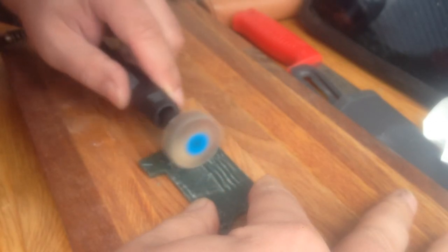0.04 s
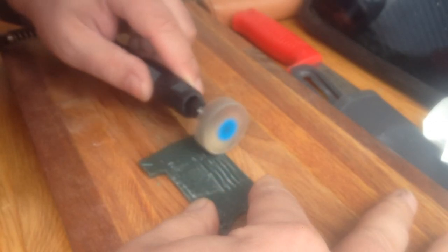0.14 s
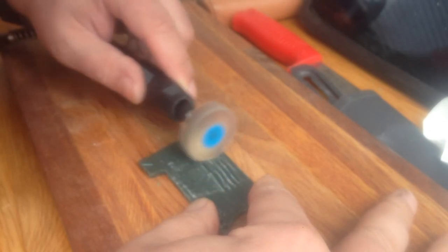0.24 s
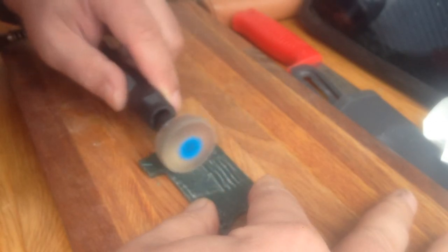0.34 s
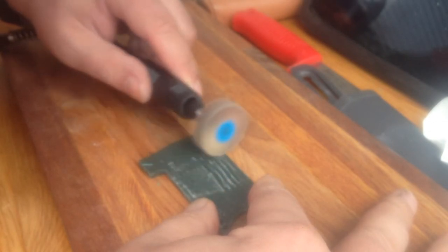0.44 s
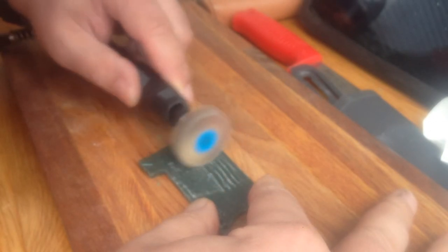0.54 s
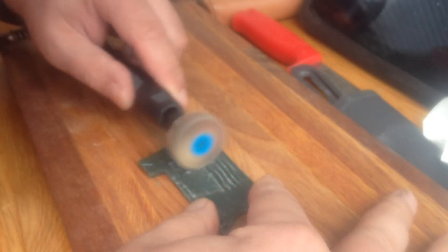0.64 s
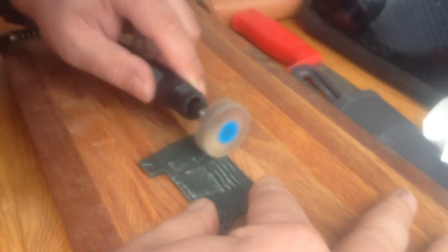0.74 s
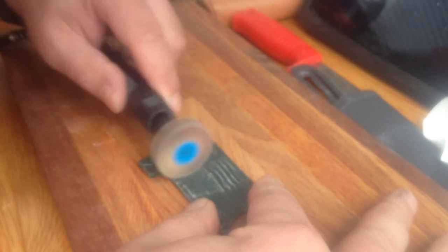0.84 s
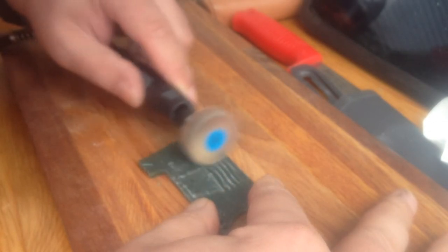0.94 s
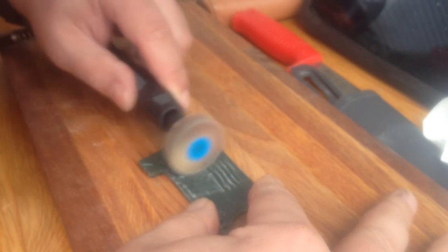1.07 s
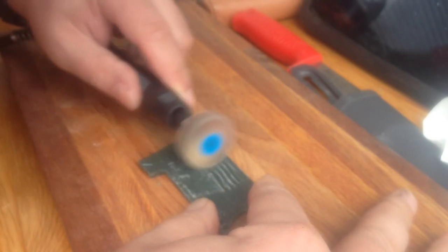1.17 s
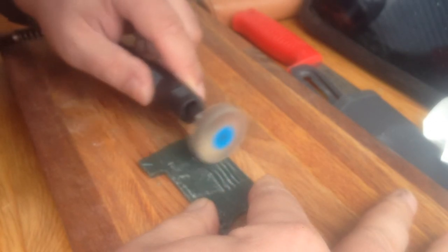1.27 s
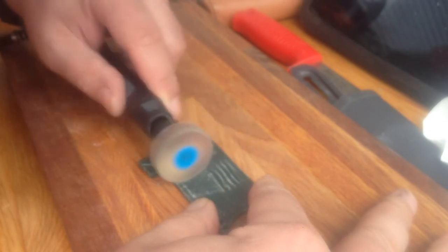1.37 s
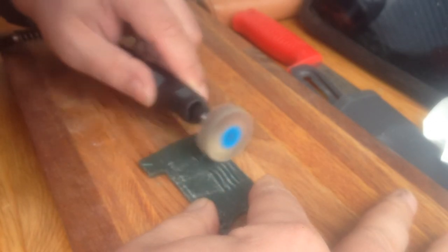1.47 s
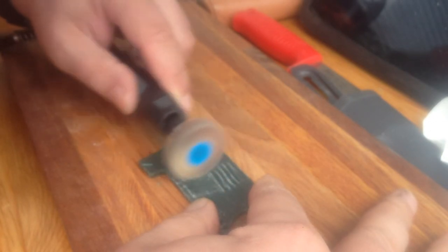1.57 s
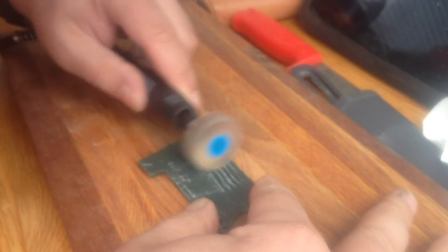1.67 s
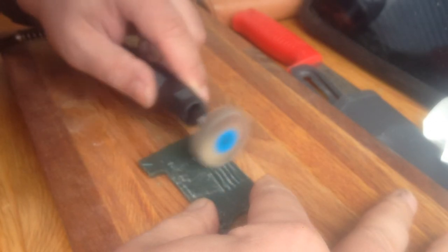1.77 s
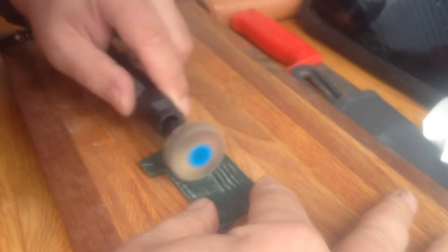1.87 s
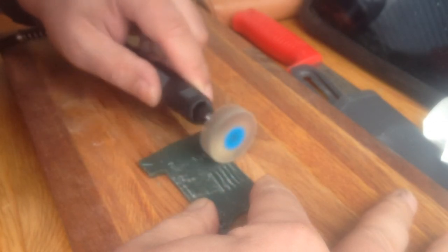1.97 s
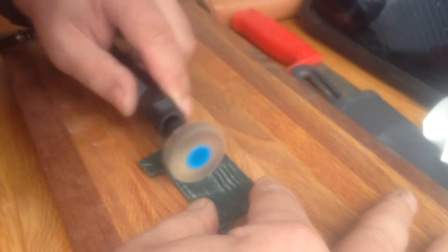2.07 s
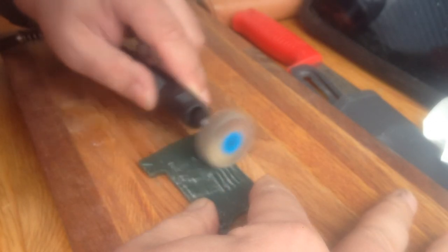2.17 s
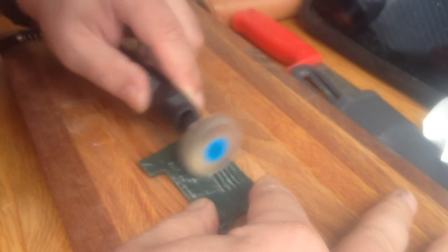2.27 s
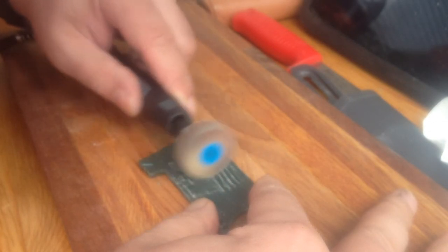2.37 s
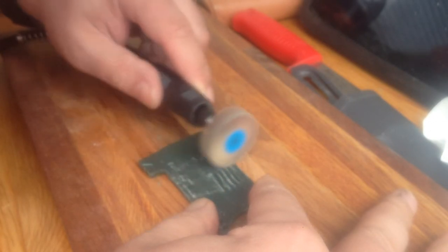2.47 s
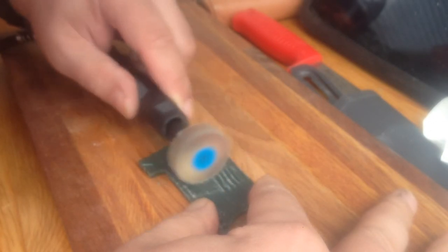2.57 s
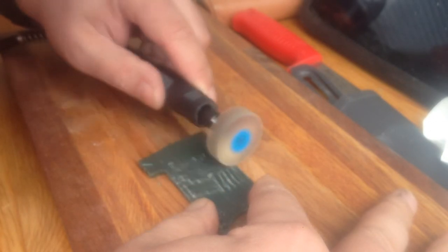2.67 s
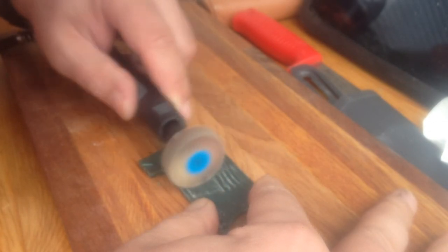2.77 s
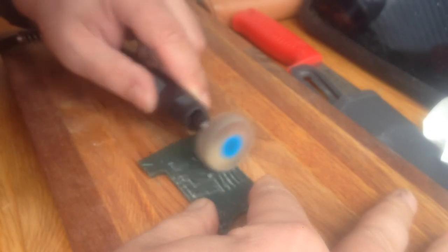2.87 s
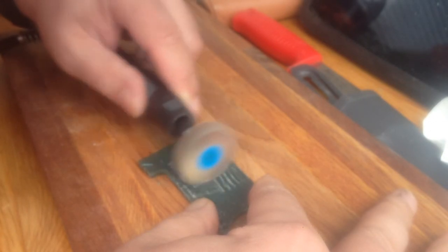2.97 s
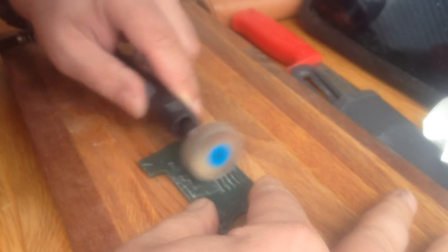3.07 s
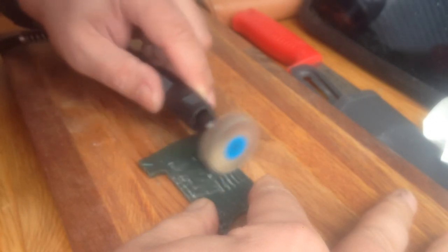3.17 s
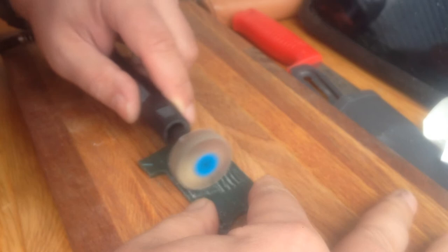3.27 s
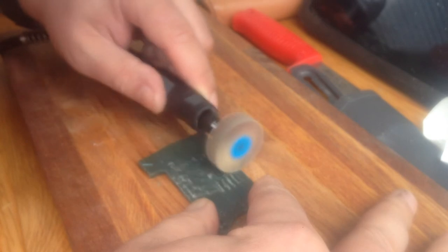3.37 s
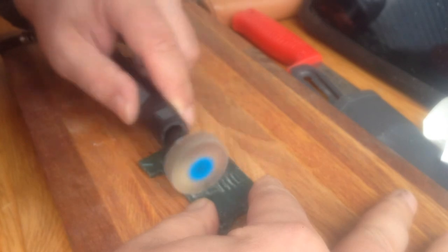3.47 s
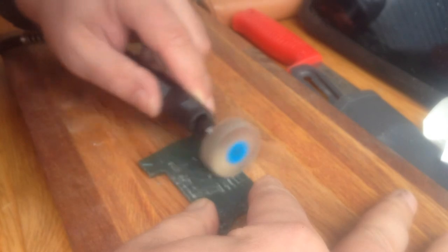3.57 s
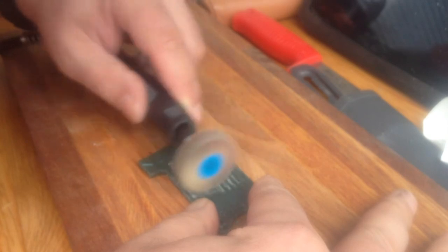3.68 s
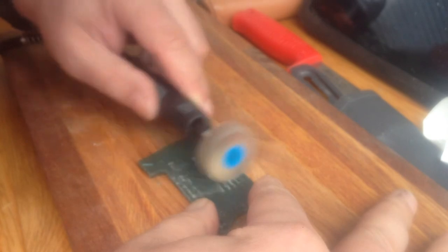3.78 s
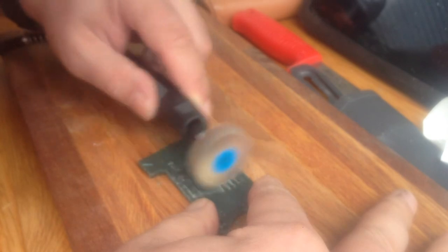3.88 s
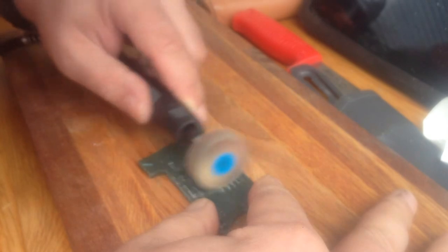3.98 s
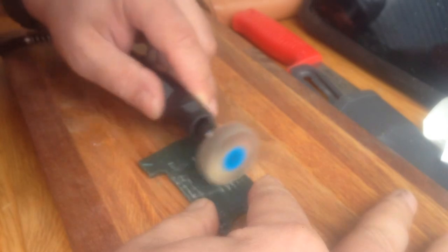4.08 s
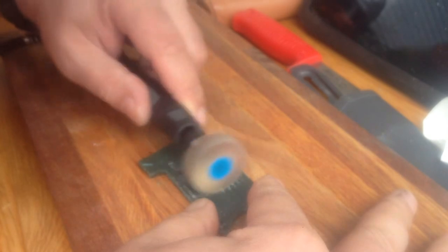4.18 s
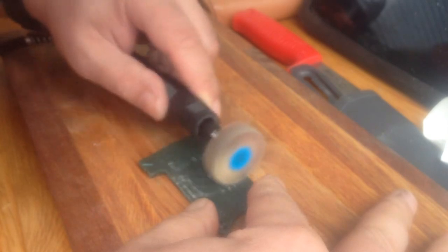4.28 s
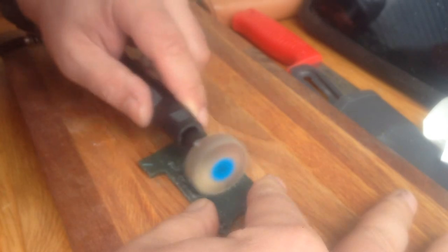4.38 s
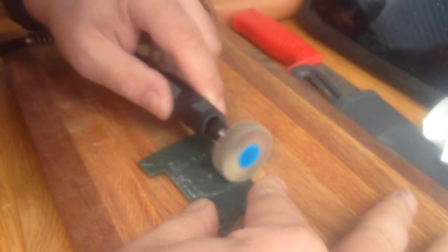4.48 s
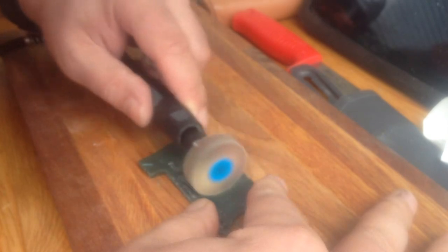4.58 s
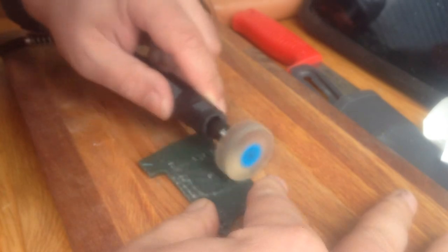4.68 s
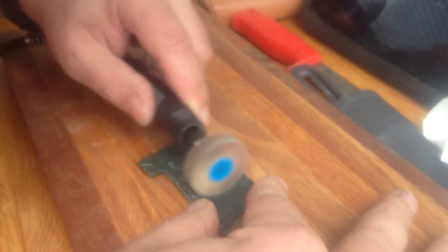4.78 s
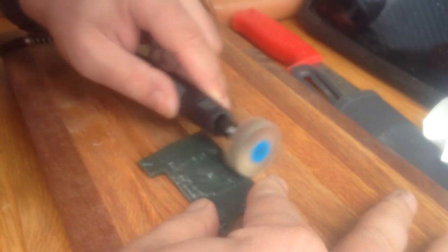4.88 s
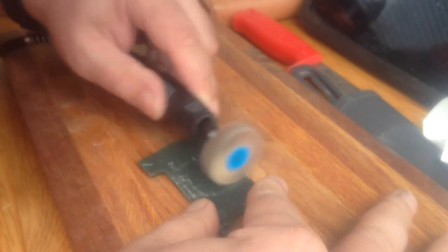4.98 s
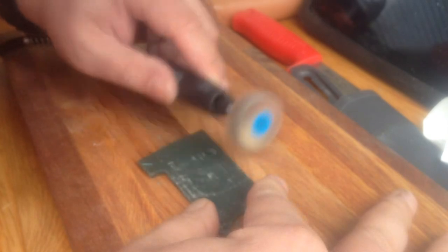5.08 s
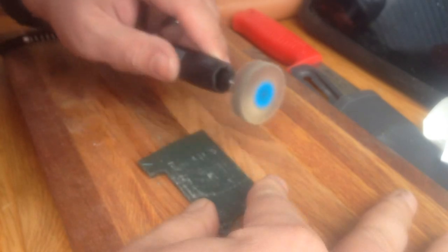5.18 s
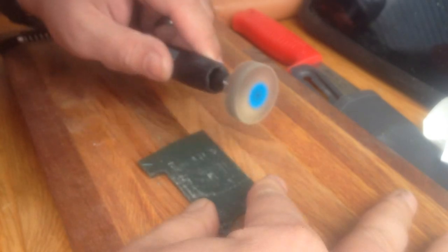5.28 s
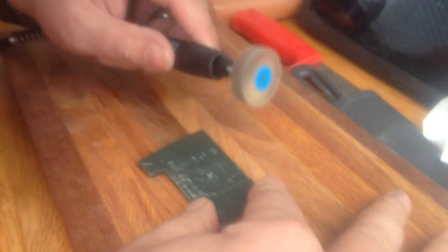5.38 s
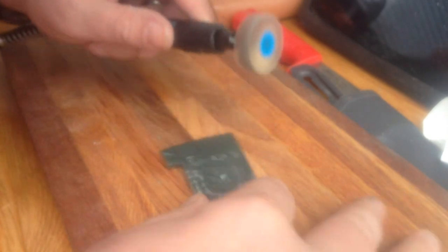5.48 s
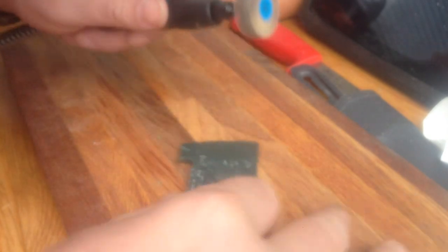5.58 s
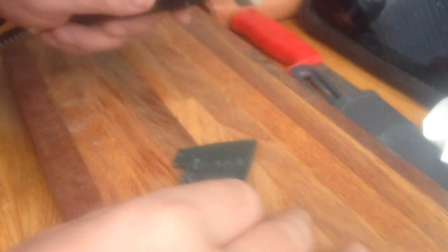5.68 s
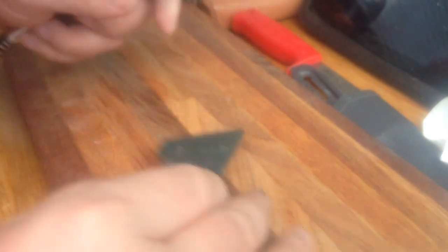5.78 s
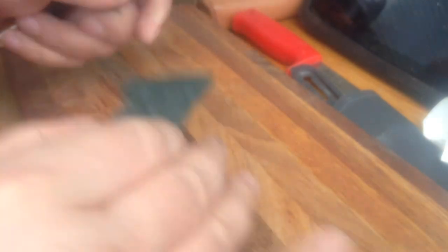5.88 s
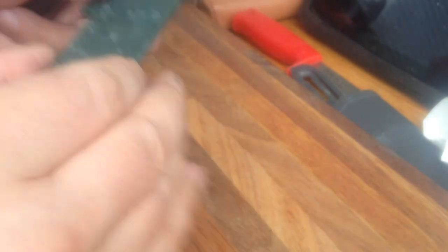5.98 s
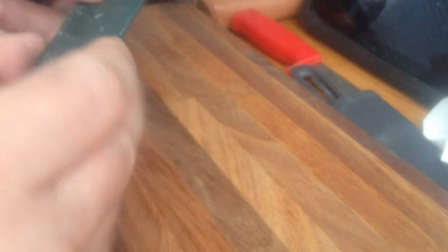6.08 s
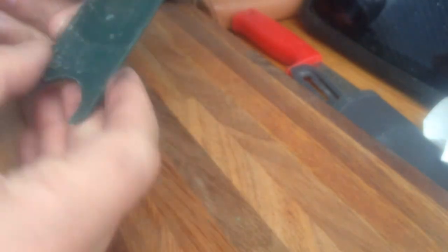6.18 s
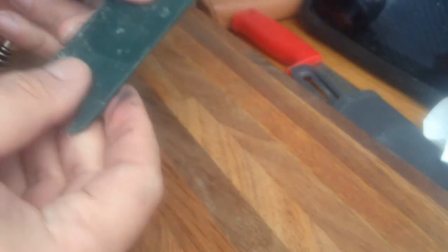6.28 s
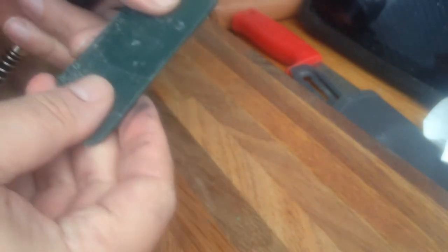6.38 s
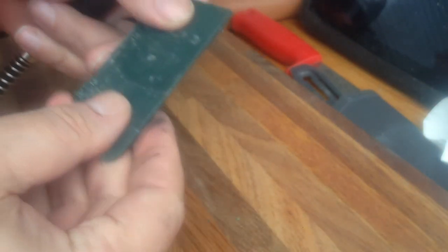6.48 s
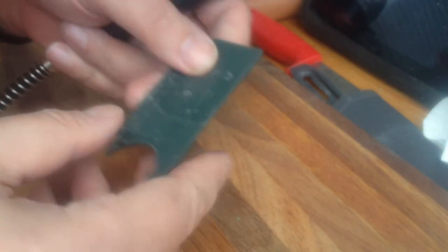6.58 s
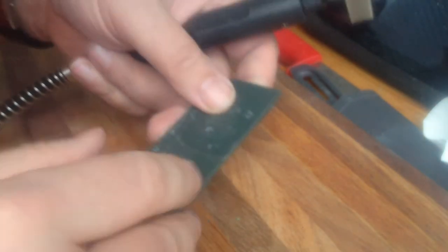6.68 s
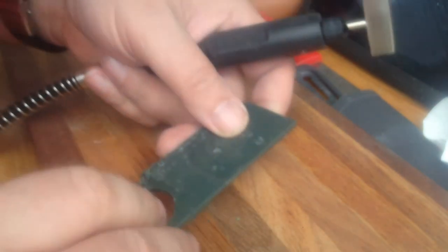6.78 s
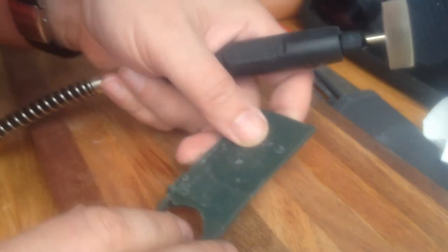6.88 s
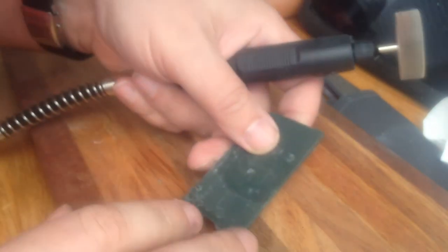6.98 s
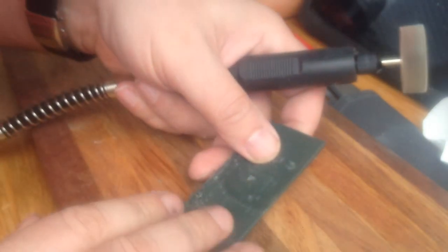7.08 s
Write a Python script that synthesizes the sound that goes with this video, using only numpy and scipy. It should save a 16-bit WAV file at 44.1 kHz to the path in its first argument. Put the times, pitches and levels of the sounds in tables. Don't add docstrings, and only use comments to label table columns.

```python
import sys
import numpy as np
from scipy import signal
from scipy.fft import rfft, irfft
from scipy.io import wavfile
from scipy.ndimage import uniform_filter1d, map_coordinates

SR = 44100
rng = np.random.default_rng(int(sys.argv[2]) if len(sys.argv) > 2 else 0)


def inscribe(sig):
    pcm = np.round(np.clip(np.atleast_2d(sig).T, -1, 1) * 32767)
    wavfile.write(sys.argv[1], SR, pcm.astype(np.int16))


def how_loud(loudness_db):
    steps = np.asarray(loudness_db, float) / 20
    return 10 ** steps


N = 314874
TIME_S = np.arange(N) / SR

# start_s, bite_sharpness, returning_grain_share (0-1)
CONTACT = [(0, 2.9, .55), (.19, 1.3, .55), (.25, .3, .75), (.4, .64, .66), (.75, .63, .52), (1, .98, .28),
           (2, .7, .38), (4, .62, .42), (4.9, .55, .53), (5.15, .63, .3), (5.5, .6, .5), (7.14, .6, .55)]


def in_time(rows):
    s, *columns = np.transpose(rows)
    return [np.interp(TIME_S, s, column) for column in columns]


def rms_one(x):
    return x / np.sqrt(np.mean(x ** 2) + 1e-20)


def drift(rate_hz):
    r = np.exp(-40 * np.pi * rate_hz / SR)
    slow = signal.lfilter([1], [1, -2 * r, r * r], rng.standard_normal(N // 20 + 4002))[4000:]
    return np.interp(np.arange(N) / 20, np.arange(len(slow)), rms_one(slow))


def low_pass(x, order, hz):
    return signal.sosfilt(signal.butter(order, hz, fs=SR, output="sos"), x)


def high_pass(x, order, hz):
    return signal.sosfilt(signal.butter(order, hz, "high", fs=SR, output="sos"), x)


def band_pass(x, order, low_hz, high_hz):
    return signal.sosfilt(signal.butter(order, [low_hz, high_hz], "band", fs=SR, output="sos"), x)


def resonance(x, hz, width_hz):
    r = np.exp(-np.pi * width_hz / SR)
    return signal.lfilter(np.array([1, 0, -1]) * (1 - r * r) / 2, [1, -2 * r * np.cos(2 * np.pi * hz / SR), r * r], x)


def body(x, modes):
    rings = [how_loud(db) * resonance(x, hz, width_hz) for hz, width_hz, db in modes]
    return rms_one(sum((-1) ** k * ring for k, ring in enumerate(rings)))


def coloured(x, spectrum):
    hz, db = np.transpose(spectrum)
    bins_hz = np.maximum(np.arange(N // 2 + 1) * SR / N, 1)
    return rms_one(irfft(rfft(x) * how_loud(np.interp(np.log(bins_hz), np.log(hz), db)), N))


def moving_rings(x, hz, width_hz, apart_hz, place):
    carrier = np.exp(2j * np.pi * np.cumsum(hz) / SR)
    r = np.exp(-np.pi * width_hz / SR)
    low = x * carrier.conj()
    rings = 0
    for side in (-1, 0, 1):
        share = 0.037 + np.exp(-1.5 * (place - side) ** 2)
        pole = r * np.exp(2j * np.pi * side * apart_hz / SR)
        rings = rings + share * signal.lfilter([1 - r], [1, -pole], low)
    return 2 * np.real(rings * carrier)


def boom_db(tone_hz, mode):
    hz, width_hz, db = mode
    return 20 * np.log10(1 + how_loud(db) / (1 + (2 * (tone_hz - hz) / width_hz) ** 4) ** 2)


def lifted():
    return np.interp(TIME_S, [4.999, 5.004, 5.02, 5.039, 5.044, 5.12, 5.13, 5.165],
                     [0.99, 0.61, 0.2, 0.11, 0.92, 0.85, 0.434, 0.029])


def settling_db():
    settle_s = (0.142, 0.466)     # start_s, end_s
    return np.interp(TIME_S, settle_s, [-5.5, 0])


def bite(turns, sharpness, uneven_db, lets_go=0):
    strength = how_loud(uneven_db * rng.standard_normal(2000))
    cosine = np.cos(2 * np.pi * turns)
    skewed = np.cos(2 * np.pi * turns + lets_go * (1 - cosine))
    lobe = np.exp(sharpness * (skewed - 1)) * np.interp(turns, np.arange(2000), strength)
    return lobe / np.sqrt(uniform_filter1d(lobe ** 2, size=2400))


def grit(turns, worn_in):
    grains = rng.standard_normal((160, 320))
    returning = map_coordinates(grains, [turns / 12 + 2, turns % 1 * 320], order=1, mode="grid-wrap")
    returning = rms_one(signal.lfilter([1, -.35], [1], returning))
    share = np.clip(worn_in * in_time(CONTACT)[1], 0, 1)
    return np.sqrt(share) * returning + np.sqrt(1 - share) * rng.standard_normal(N)


def wheel_turns(turns, press_db):
    load = uniform_filter1d(press_db, size=2500)
    load = (load - uniform_filter1d(load, size=12000)) * lifted()
    return turns - .55 * np.cumsum(load) / SR + 0.0392 * drift(3) + 0.0031 * drift(27)


def pressing():
    # start_s, length_s, pressure_db, place (0-3 from the tab to the far edge, more counts as 3)
    passes = [(-0.05, 0.087, -31, 0.23), (0.075, 0.074, -31.5, 0.36), (0.173, 0.057, -32.5, 0.044),
              (0.258, 0.056, -24, 0.49), (0.357, 0.065, -28, 0.28), (0.452, 0.071, -29, 0.7),
              (0.662, 0.12, -29, 0.57), (0.907, 0.16, -29.5, 0.87), (1.166, 0.14, -27, 0.8),
              (1.414, 0.15, -26.5, 0.78), (1.657, 0.14, -27.5, 1.12), (1.907, 0.14, -27, 1.6),
              (2.14, 0.14, -27.5, 1.68), (2.379, 0.15, -29, 1.7), (2.612, 0.14, -28.5, 1.75),
              (2.827, 0.17, -29, 2), (3.031, 0.18, -30, 2.29), (3.25, 0.219, -28, 2.47),
              (3.507, 0.19, -28.5, 2.68), (3.745, 0.15, -27.5, 2.66), (3.974, 0.17, -27.5, 2.82),
              (4.183, 0.15, -29, 2.6), (4.413, 0.12, -29.5, 3.63), (4.649, 0.11, -29, 3.4),
              (4.867, 0.082, -28.5, 2.96), (5.048, 0.037, -27.5, 2.8)]
    # middle_s, pressure_db, place (0-3, more counts as 3)
    returns = [(0.586, -29.5, 2.5), (0.847, -32.5, 1.5), (1.114, -38.5, 0.5), (1.361, -26.5, 1.5),
               (1.614, -31.5, 5), (1.857, -22.5, 2), (2.093, -26.5, 1.5), (2.337, -21.5, 2),
               (2.577, -22, 2.2), (2.796, -24, 1.5), (3.221, -35.5, 3), (3.927, -33.5, 1.5),
               (4.593, -35, 2.1), (4.813, -29.5, 0.8), (4.992, -33, 0.5)]
    # brushing_db, rise_along_pass_db, ends_over_middle_db, place_0_db, place_1_db, place_2_db, place_3_db
    answers = [
        (-39.5, 1.5, -0.22, -3.5, -3, 3, -0.97),
        (-51.5, 2, -1.5, 1, -6.5, -9.5, 4),
        (-69, 0, 4, -8.5, 10, 7, -2),
        (-41.5, -1.5, 6.5, 12, 4.5, 4, 1.5),
        (-34.5, -13.5, -1.5, -9, -22, -6, -11.5),
        (-48.5, 3, 5.5, -31, -16.5, -18.5, -22.5),
        (-43.5, 3, -9, -46, -25, -49, -75),
    ]
    edge = [1, 0.5, 1.5, -1, 1.5, -2, 2, -1.5, 0.5, -0.2, -1.7, 0.1, -0.5, 2, 1.7, 1.5, 3.7, 1.9, 3, 0.5,
            1.5, 0.5, 3.5, 2.5, 4.5, 8, -5, -5.5, -4, -13.5, -1.5, -5.5, -8, -5.5, -4, -4.5, 3, 2.5, 4, 3.5,
            1]
    rim = [2.5, 1, 4, -1.5, 1.7, 4, -1.3, 1, 1.5, -0.5, 3.5, 0.5, 2, .3, -0.5, -2.5, -6, -2, -2.5, 0, -2.5,
           2, 0, -0.5, -1, -5.5, 9, 11, 8.5, 17.5, 10.5, 13, 8, 7, 5, 2.5, -2, 3, -11, -6, -7]
    face = [-2, -0.5, .3, -3, 0, 2, -2, 2, 0, -1.5, 0, 1.5, 2, 2, 3.5, 3, 1.5, .3, 1, 0.5, -0.5, 3, 0, .3,
            0, 2, .3, 8, -1, 2, -4, .3, .3, -4, -2, -5, -3, 4, 7, 6, 5]
    weight = [.3, 6, -1, -11, 7, -10, 9.5, 7.5, 8.5, 9, 5, 7, 8.5, 9, 4, 6, 6, 6, 3, 7.5, -4, 6, 2, -14, 6,
              -20, -5, -2, 18, 10, 8, 1, -3, -14, 3, -28, 3, 0, -11, -13, 8]
    bow = [0.63, -0.0086, .3, 2.5, 1.55, 1.4, 2.3, 0.59, 2.1, 1.2, -0.34, -0.23, 1.2, 0.32, 1.6, 2, 1.6,
           1.4, 0.71, 0.66, 0.56, 0.25, 0.69, .3, 1.4, .3, -0.18, 0.82, 0.21, 0.17, 0.37, 0.14, .3, 0.56,
           0.5, 0.7, 0.54, 2.15, .3, -0.014, .3]
    lean = [0.27, .3, 0.27, 0.35, .3, .3, 0.55, 0.34, 0.56, .3, .3, 0.27, .3, 0.34, 0.35, 0.35, 0.21, 0.4,
            0.15, 0.36, 0.34, .3, .3, .3, 0.23, .3]
    press_s, ease_s, return_s = 0.055, 0.0406, 0.0278
    rows = passes + [(s - return_s / 2, return_s, db, place) for s, db, place in returns]
    start, length, db, place = np.transpose(rows)[:, :, None]
    t = np.arange(0, N + 64, 64) / SR
    shape = np.clip((t - start) / press_s + .5, 0, 1) * np.clip((start + length - t) / ease_s + .5, 0, 1)
    along = np.clip((t - start) / length - .5, -.5, .5)
    edge_db, rim_db, face_db, weight_db, bow_db = np.array([edge, rim, face, weight, bow])[:, :, None]
    lean_db = np.pad(lean, (0, len(returns)))[:, None]
    grips = [0, face_db, edge_db, edge_db + rim_db, 0.64 * edge_db + .4 * rim_db, weight_db, 0]
    light_db = np.interp(t, TIME_S, settling_db())
    levels_db = []
    for (brush_db, rise_db, ends_db, *by_place), grip_db in zip(answers, grips):
        touch_db = db + np.interp(abs(place), range(4), by_place) + grip_db
        touch_db = touch_db + (rise_db + lean_db) * along + ends_db * (2.8 * along ** 2 - 1.01)
        gain = how_loud(brush_db + light_db) + np.sum(shape * how_loud(touch_db), axis=0)
        levels_db.append(np.interp(TIME_S, t, 20 * np.log10(gain)))
    progress = np.sum((shape * (along + .5))[:len(passes)], axis=0) - .5
    return levels_db, np.interp(TIME_S, t, progress), np.interp(TIME_S, t, np.sum(shape * bow_db, axis=0))


def room():
    # freq_hz, density_db (per Hz)
    spectrum = [(15, -51), (25, -20), (135, -42), (183, 9), (238, 2.5), (509, -5), (762, 2), (882, 1.5),
                (1200, 0), (1560, -43), (2640, -120)]
    hum_db = -63 - 1.5 + 3.4 * lifted() + 2.5 * np.tanh(drift(5.6))
    hum = np.sqrt(2) * how_loud(hum_db) * np.sin(2 * np.pi * 99.4 * TIME_S)
    rumble_db = np.interp(TIME_S, [2.8, 3.1, 4.1, 4.3, 5.0, 5.2, 5.5, 5.7], [5.5, 7, 6.7, 3.64, 6.2, 9.7, 7, 1.5])
    rumble_db = rumble_db - 66.0 + 7.9 * np.tanh(drift(7.4))
    rumble = body(rng.standard_normal(N), [(34, 21, -2.5), (58, 20, 2.0), (109, 21, 5.0)])
    return how_loud(-57) * coloured(rng.standard_normal(N), spectrum) + how_loud(rumble_db) * rumble + hum


def bumps():
    # start_s, peak_db, pitch_hz, t60_s
    knocks = [(5.562, -36, 172.2, 0.1), (5.591, -36, 90.4, 0.11), (5.625, -45, 109, 0.096),
              (5.859, -24.5, 148.7, 0.042), (5.869, -35, 169, 0.038), (5.876, -20.5, 97, 0.079),
              (5.904, -26.5, 114, 0.17), (5.93, -42, 128, 0.19), (5.974, -37, 120, 0.066),
              (6.859, -41, 91.4, .08), (6.902, -39, 80, 0.069), (6.919, -40, 75.2, 0.12),
              (6.945, -46, 99.8, 0.073), (7.125, -27.5, 89.9, 0.073), (7.131, -42.5, 101.6, 0.11)]
    out, t = np.zeros(N + SR), np.arange(SR // 4) / SR
    puffs = low_pass(rng.standard_normal((len(knocks), len(t))), 2, 450)
    for (s, db, hz, t60), puff in zip(knocks, puffs):
        envelope = how_loud(db - 60 * t / t60) * (1 - np.exp(-t / 0.00041))
        first = round(s * SR)
        out[first:first + len(t)] += (np.sin(2 * np.pi * hz * t) + 1.9 * puff) * envelope
    return out[:N]


def rubs():
    # middle_s, length_s, centre_hz, level_db
    slides = [
        (5.88, 0.29, 3900, -43.5),
        (6.224, 0.11, 4500, -55),
        (6.799, 0.27, 4200, -43),
        (7.05, 0.21, 4700, -48.5),
        (5.566, .018, 1500, -43),
        (6.7, .08, 3350, -42),
        (6.5, .4, 9100, -60),
    ]
    skin = rng.standard_normal(N)
    out = 0
    for s, length, hz, db in slides:
        swell = np.clip(1 - abs(TIME_S - s) / length, 0, 1)
        out = out + how_loud(db) * swell * rms_one(resonance(skin, hz, 900))
    return out


def motor(turns, speed_hz):
    # start_s, once_a_turn_db, other_multiples_db
    whine = [(0, -55, 7.5), (.35, -45.5, 8.5), (.9, -47, 1), (2.1, -51.5, -10.5), (3, -50.5, -1),
             (4.95, -51.5, 2.5), (5.05, -62, -1), (5.4, -62, -1), (5.6, -55, -1.5), (6.25, -56, -1.5),
             (6.62, -42, 3), (6.9, -59, 0), (7.14, -62, 5)]
    # speed_multiple, level_db
    harmonics = [(2, -72.5), (3, -72), (3.53, -71.5), (5, -65.5), (6, -62.5), (7, -70.5), (8, -60.5),
                 (9, -60.5), (10, -60.5), (11, -58.5), (12, -58), (13, -56), (14, -62.5), (16, -55)]
    # mode_hz, width_hz, lift_db
    housing = [(310, 11, 21), (527, 16, 14.5), (1462, 19, 3.5), (2800, 45, 9)]
    # mode_hz, width_hz, lift_db
    can = (695.6, 128, 26.3)
    # mode_hz, width_hz, lift_db
    cap = (860, 48, 17.1)
    whistles = [32, 48]
    # start_s, first_db, second_db
    whistle_db = [(0, -62, -66), (5.0, -64, -68), (5.4, -72, -70), (5.75, -54, -63), (6.1, -53, -57),
                  (6.3, -63, -58), (6.7, -62, -58), (6.95, -56, -63), (7.14, -57, -64)]
    # start_s, then level_db at 3.53, 8, 13, 14 and 16 a turn
    free_tones = [(5.2, -75, -78, -78, -75, -78), (5.5, -66, -62, -64, -66, -68),
                  (5.75, -66, -65.5, -60, -67, -62), (5.95, -59, -50, -56, -66.5, -55),
                  (6.2, -62, -58, -57, -63, -62), (6.5, -59, -64, -57, -56, -61),
                  (6.8, -55.5, -60, -57, -58, -62), (7.14, -61.5, -64, -61.5, -42, -60)]
    once_db, other_db = in_time(whine)
    load = lifted()
    tones = [(1, once_db), (4, -68.5 + 2 * settling_db() + boom_db(4 * speed_hz, can)),
             (4.41, -68.5 + boom_db(4.41 * speed_hz, cap))]
    tones += [(multiple, db + other_db) for multiple, db in harmonics]
    shake = turns + 0.0069 * drift(15.5) + 0.0069 * drift(104)
    out = 0
    for multiple, db in zip(whistles, in_time(whistle_db)):
        out = out + how_loud(db + 3 * drift(6)) * np.sin(2 * np.pi * multiple * (turns + .006 * drift(8)))
    for multiple, db in zip((3.53, 8, 13, 14, 16), in_time(free_tones)):
        out = out + how_loud(db + 2 * drift(7)) * np.sin(2 * np.pi * multiple * (turns + .004 * drift(8)))
    for multiple, db in tones:
        lift = 1
        if multiple % 1 == 0:
            for hz, width_hz, lift_db in housing:
                lift = lift + how_loud(lift_db) / (1 + (2 * (multiple * speed_hz - hz) / width_hz) ** 2)
        flutter_db = {1: .8 + 3.5 * load, 4: .8}.get(multiple, 3.0)
        tone = np.sin(2 * np.pi * (multiple * shake + rng.random()))
        out = out + lift * how_loud(db + flutter_db * drift(10.3)) * tone
    return np.sqrt(2) * out


def shaft(turns, bow_db):
    # mode_hz, width_hz, level_db
    sheath_modes = [(2224, 184, 6), (2478, 60, 2.5)]
    # start_s, hollow_ring_hz, ring_db, upper_over_lower_mode_db
    hand = [(0, 2843, -52, 1), (.5, 2877, -43, 2), (1.5, 2880, -41, 3), (3.8, 2901, -42.5, -0.5),
            (5.1, 2934, -76, 9), (5.5, 2913, -49, -16), (5.8, 2692, -53, -15), (5.88, 2753, -48, 28),
            (6.2, 3102, -42.5, -5.5), (6.7, 3515, -41.5, 3), (6.8, 3000, -50.5, 16), (6.95, 2640, -40.5, 5),
            (7.14, 2800, -40, 0)]
    # freq_hz, density_db (per Hz)
    air_spectrum = [(470, -49), (800, -42), (873, -46), (1220, -7.5), (1430, -9), (1640, -10.5), (2210, -3),
                    (5540, -1.5), (8980, -5), (15500, -13.5)]
    # sheath_db, air_db
    loaded = (-37.5, -28.5)
    # sheath_db, air_db
    free = (-43, -41.5)
    ring_hz, ring_db, tilt_db = in_time(hand)
    load = lifted()
    let_go_db = -11 * np.clip((TIME_S - 6.75) / 0.11, 0, 1)
    sheath_db = settling_db() + load * loaded[0] + (1 - load) * free[0] + let_go_db
    air_db = settling_db() + load * loaded[1] + (1 - load) * (free[1] + TIME_S - 6)
    chafe = bite(turns, 0.22, uneven_db=1.0) * [grit(turns, worn_in=1.23), *rng.standard_normal((2, N))]
    lower, upper = [body(chafe[0], [mode]) for mode in sheath_modes]
    tilt = how_loud(tilt_db)
    sheath = (lower - tilt * upper) / np.sqrt(1 + tilt ** 2) * how_loud(sheath_db + bow_db + 1.7 * drift(6.4))
    spread = low_pass(chafe[1:], 2, 400)
    carrier = 2 * np.pi * np.cumsum(ring_hz) / SR
    hollow = rms_one(spread[0] * np.cos(carrier) + spread[1] * np.sin(carrier)) * how_loud(ring_db + drift(23))
    air = coloured(chafe[0] + 0.53 * chafe[2], air_spectrum)
    return sheath + hollow + air * how_loud(air_db + 0.58 * bow_db + 1.85 * load * drift(6.5))


def chatter():
    # middle_s, level_db
    swells = [(1.42, -45), (2.2, -42), (2.39, -41), (2.46, -41.5), (2.85, -39.5), (3.48, -42), (4.13, -43),
              (.45, -54), (.715, -34.5), (1.0, -54), (1.2, -44), (1.89, -35), (1.97, -38), (2.11, -34),
              (2.33, -36), (2.55, -37), (2.63, -35.5), (3.3, -36.5), (3.53, -41), (3.74, -39.5),
              (3.97, -39), (4.4, -43), (4.5, -45), (4.56, -39), (4.62, -42.5), (4.68, -44), (4.75, -38.5),
              (4.8, -48), (4.85, -37.5), (4.92, -43.5), (5.09, -37.5)]
    s, db = np.transpose(swells)[:, :, None]
    t = np.arange(0, N + 64, 64) / SR
    return np.interp(TIME_S, t, np.sum(how_loud(db) * np.clip(1 - abs(t - s) / 0.054, 0, 1), axis=0))


def bench(turns, thrum_db, rattle_db):
    # mode_hz, width_hz, level_db
    thrum_modes = [(286.7, 33, 12.5), (374, 9.2, 4.5), (413.3, 6.4, 1.5), (551, 39, -3.5), (681.3, 25, 3)]
    # mode_hz, width_hz, level_db
    rattle_modes = [(927, 450, 0.5), (1203.4, 35, 15.2), (1605, 550, 2.3), (1887, 24, 10)]
    # mode_hz, width_hz, level_db
    loose_ring = (1215, 26, 3)
    # start_s, level_db
    buzz_levels = [
        (.2, -75),
        (.29, -46),
        (.45, -51),
        (.7, -47.5),
        (.9, -65),
        (1.0, -70),
    ]
    rocking = turns + 0.053 * drift(16.7)
    push = np.diff(bite(rocking, 43.0, uneven_db=-1.0), prepend=0) * how_loud(3.75 * np.tanh(drift(26.5)))
    tearing = bite(turns, 0.089, uneven_db=-1.5) * grit(turns, worn_in=1.73)
    thrum = body(rms_one(push) + 0.85 * tearing, thrum_modes)
    knock = np.diff(bite(turns, 530.0, uneven_db=1.0), prepend=0) * how_loud(7 * np.tanh(drift(12)))
    rattle = body(rms_one(knock) + 2.2 * tearing, rattle_modes)
    loose = how_loud(loose_ring[2]) * body(tearing, [loose_ring])
    buzz = how_loud(in_time(buzz_levels)[0] + 6.0 * drift(16)) * np.sqrt(2) * np.sin(4 * np.pi * turns)
    thrum = how_loud(thrum_db + 2.14 * np.tanh(drift(3.4))) * thrum
    return (thrum + how_loud(rattle_db) * rattle + chatter() * (0.46 * rattle + loose) + buzz) * lifted()


def catches():
    # start_s, peak_db, t60_s
    bursts = [
        (0.178, -3, .012),
        (.188, -14, .012),
        (.221, -13, .01),
        (.638, -9, 0.1),
        (4.996, -7, 0.016),
        (5.043, -14, .03),
        (5.102, -11.5, 0.06),
    ]
    out, t = np.zeros(N), np.arange(SR // 10) / SR
    grains = band_pass(rng.standard_normal((len(bursts), len(t))), 2, 7500, 12500)
    for (s, db, t60), grain in zip(bursts, grains):
        first = round(s * SR)
        out[first:first + len(t)] += grain * how_loud(db - 2.5 - 60 * t / t60) * (1 - np.exp(-t / .0012))
    return out


def wheel(turns, band_db, progress):
    # low_hz, high_hz, width_hz, ring_over_hiss_db, mode_spacing_hz, slide_along_pass (modes)
    plate = [
        (3850, 5000, 110, 12.5, 150, .2),
        (5200, 6420, 130, 7.5, 170, -.35),
        (7000, 8800, 280, 7.5, 260, .9),
        (8400, 11400, 260, 10, 200, .3),
        (11400, 16200, 900, -9, 900, .3),
    ]
    # start_s, first_hz, second_hz, third_hz, fourth_hz
    ring_centres = [(0, 4660, 5900, 8100, 10500), (.2, 4630, 5840, 7850, 10550),
                    (.8, 4570, 5770, 8160, 9870), (1.0, 4847, 6060, 7840, 9800),
                    (1.5, 4720, 6150, 7960, 9550), (2.0, 4632, 6230, 8200, 9100),
                    (2.7, 4560, 5810, 8060, 9100), (3.6, 4570, 5610, 8000, 9850),
                    (4.3, 4500, 5900, 8400, 9400), (5.2, 4440, 6020, 7800, 9600)]
    # start_s, swing_hz, swings_per_pass, ring_db
    roll = [(0, 150, 0.42, -6), (.5, 350, 0.53, -2), (.7, 440, 1.3, .3), (1.2, 453, 1.5, 0),
            (1.7, 895, 1.65, 0), (2.3, 840, 1.45, -10), (2.8, 500, 0.95, -16), (4.4, 250, 1.05, -11),
            (4.7, 200, 1.05, -10), (5.2, 199.9, 1.05, -5)]
    sharpness = in_time(CONTACT)[0]
    tearing = [grit(turns, worn_in=1.4), grit(turns, worn_in=1.3)]
    centres, (swing_hz, swings, fade_db) = in_time(ring_centres), in_time(roll)
    centres[3] = centres[3] + swing_hz * np.cos(2 * np.pi * swings * (progress + .5))
    centres[2] = centres[2] + 220 * np.sin(2 * np.pi * 1.2 * progress) + 90 * drift(7)
    centres[0] = centres[0] + 45 * drift(6)
    centres.append(centres[3] * 1.07)
    out = 0
    for k, (low_hz, high_hz, width_hz, ring_db, apart_hz, slide) in enumerate(plate):
        unsteady = turns + 0.15 * drift(11.0) / (1 + sharpness)
        sharp = np.clip(sharpness * (1.09 + 0.18 * (k == 2)), 0, 8)
        force = bite(unsteady, sharp, uneven_db=-2.0, lets_go=0.42) * tearing[k % 2]
        hiss = band_pass(force, 3, low_hz, high_hz)
        rings = moving_rings(hiss, centres[k], width_hz, apart_hz, 0.3 * drift(6) - slide * progress)
        band = hiss + how_loud(ring_db + (k == 3) * fade_db) * rings
        band = band / np.sqrt(uniform_filter1d(uniform_filter1d(band ** 2, size=480), size=620))
        out = out + band * how_loud(band_db[k] + 0.7 * drift(9.7))
    finest = high_pass(out, 2, 12000)
    dull = low_pass(out, 4, 11800)
    grazing = np.interp(TIME_S, [.17, .2], [.7, 0])
    lift = how_loud(np.interp(TIME_S, [2.5, 3, 5], [-20, -8, -8]))
    return ((1 - grazing) * out + grazing * dull + lift * finest) * lifted()


def sinking_bands(x):
    # centre_hz, width_hz
    notches = [(2830, 260), (6600, 260), (8800, 300), (11200, 350), (12900, 450), (13800, 400),
               (14800, 450)]
    for hz, width_hz in notches:
        depth = np.clip(.2 + .5 * drift(5), 0, .97) * (.6 + .4 * lifted())
        x = x - depth * resonance(x, hz, width_hz)
    return x


def scene():
    # start_s, speed_hz (turns per second)
    speeds = [(0.0, 181), (0.16, 184.7), (1.21, 171.2), (2.46, 151.7), (2.5, 149.1), (3.34, 138.7),
              (3.36, 136.3), (4.24, 139.3), (4.69, 134.3), (4.95, 135.3), (5.11, 143), (5.33, 160.6),
              (5.61, 174.5), (6.12, 186.4), (6.76, 191.8), (7.14, 193)]
    speed_hz = in_time(speeds)[0]
    press_db, progress, bow_db = pressing()
    turns = np.cumsum(speed_hz) / SR
    rim = wheel_turns(turns, press_db[0])
    background = room() + bumps() + rubs()
    tool = motor(turns, speed_hz) + bench(rim, *press_db[-2:]) + catches()
    return (background + tool + sinking_bands(shaft(rim, bow_db) + wheel(rim, press_db, progress)))[None]


def top_cut(x):
    return signal.sosfilt(signal.butter(12, 15330, fs=SR, output="sos"), x)


def record(dry):
    mix = high_pass(dry, 2, 45)
    mix = signal.sosfilt(signal.ellip(12, .5, 70, 15330, fs=SR, output="sos"), mix)
    return top_cut(mix)


dry = scene()
out = record(dry)
inscribe(out)
```